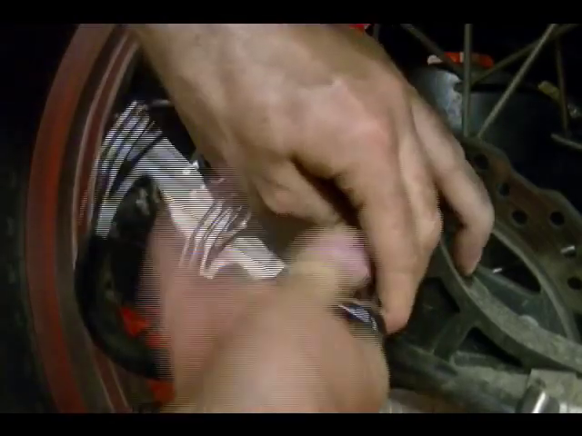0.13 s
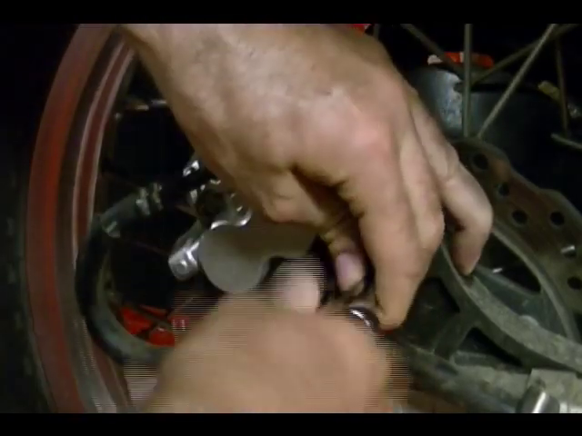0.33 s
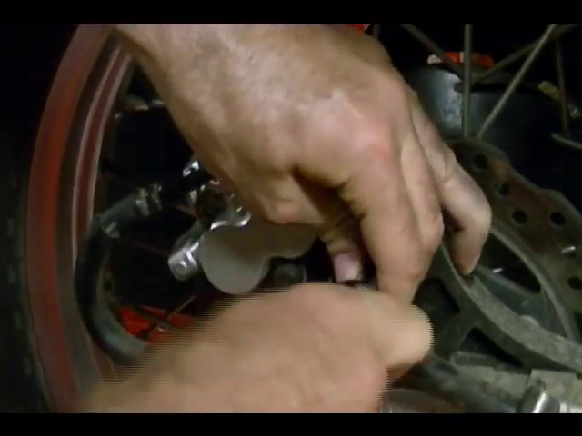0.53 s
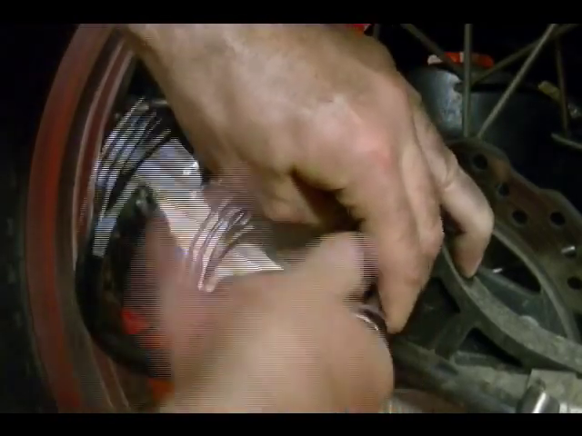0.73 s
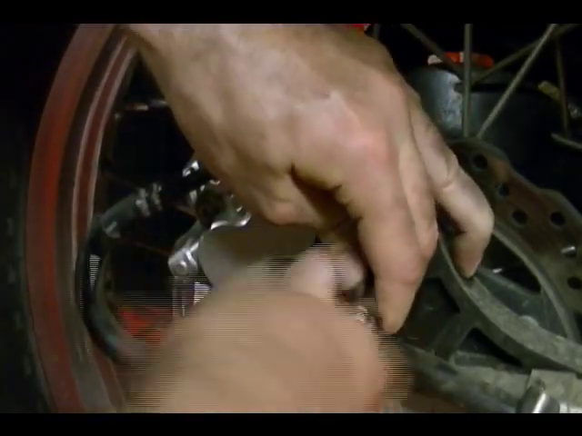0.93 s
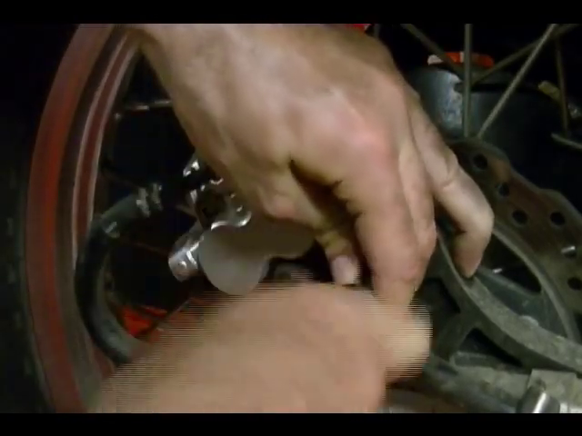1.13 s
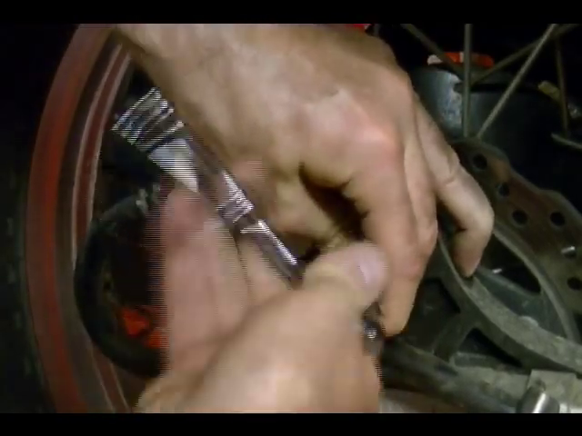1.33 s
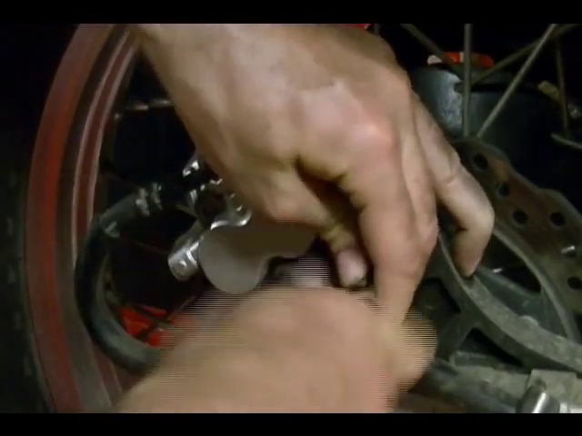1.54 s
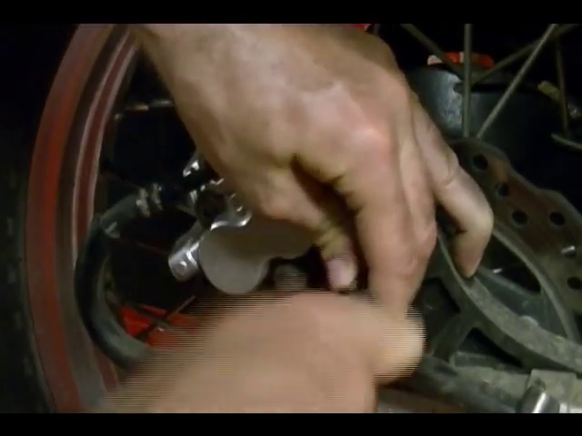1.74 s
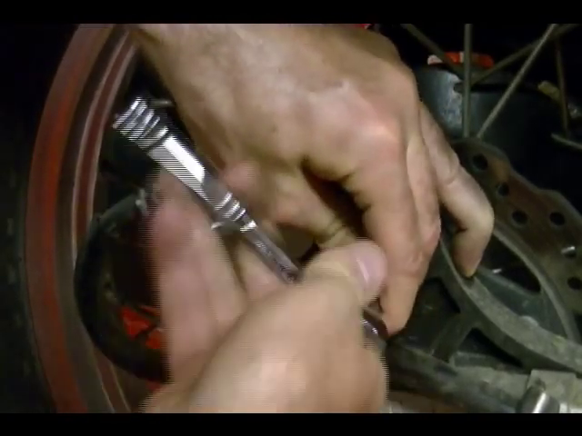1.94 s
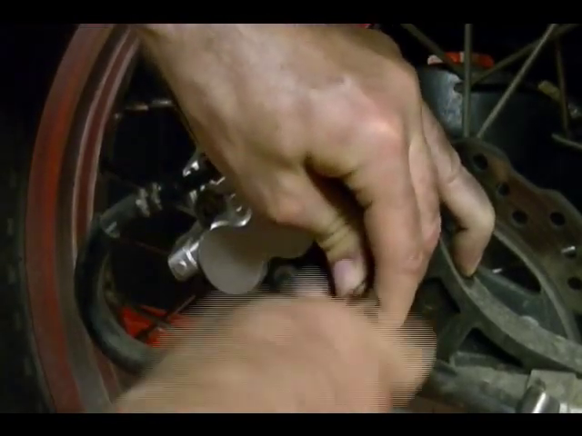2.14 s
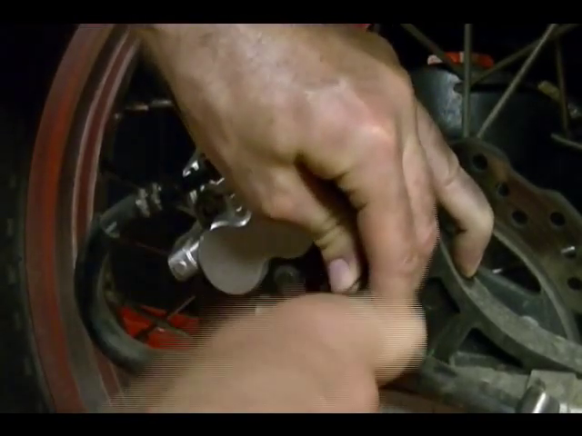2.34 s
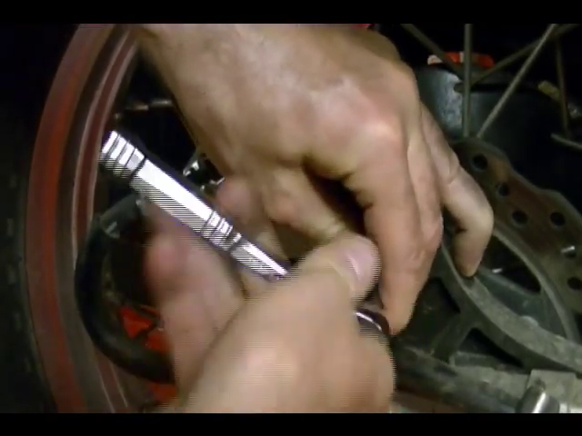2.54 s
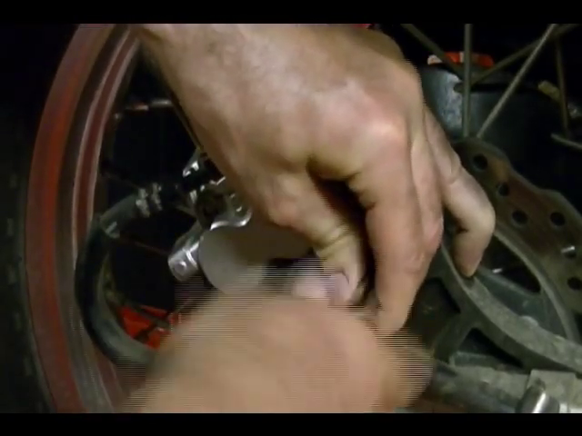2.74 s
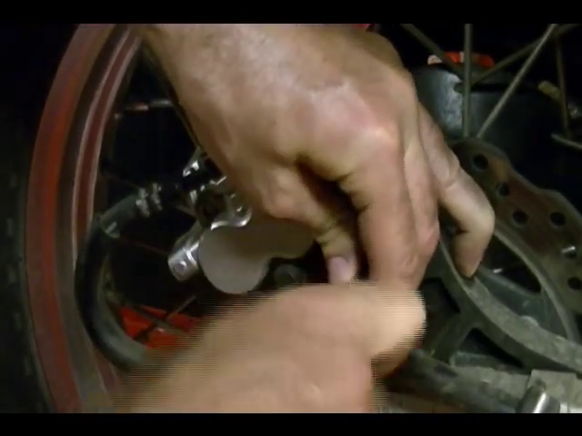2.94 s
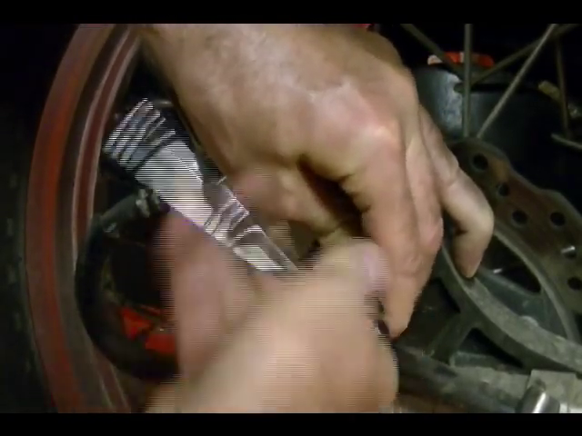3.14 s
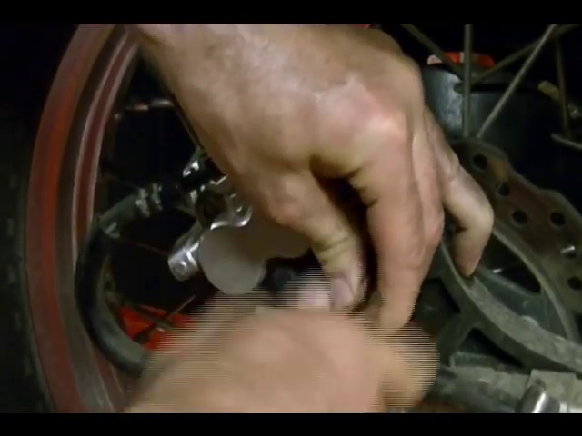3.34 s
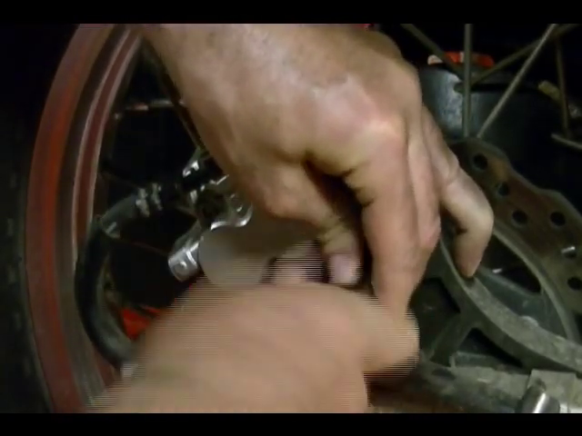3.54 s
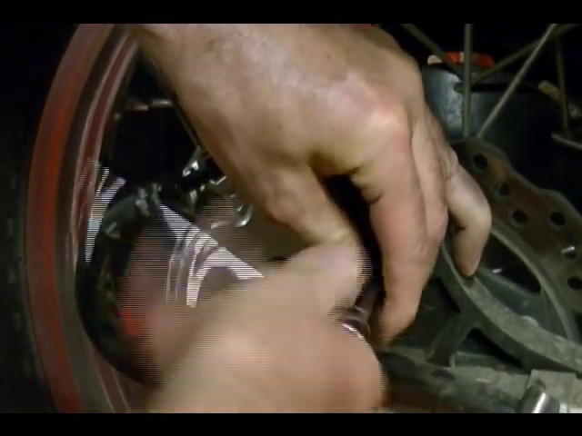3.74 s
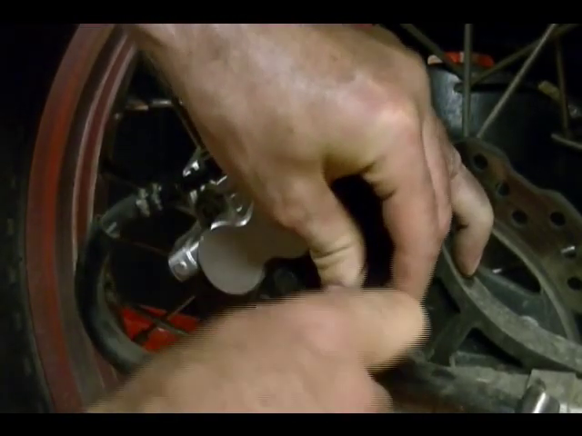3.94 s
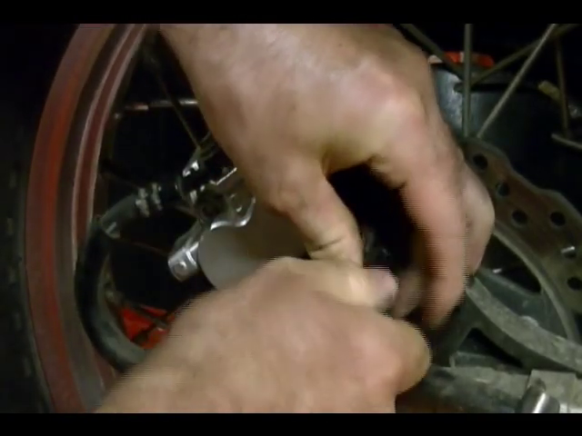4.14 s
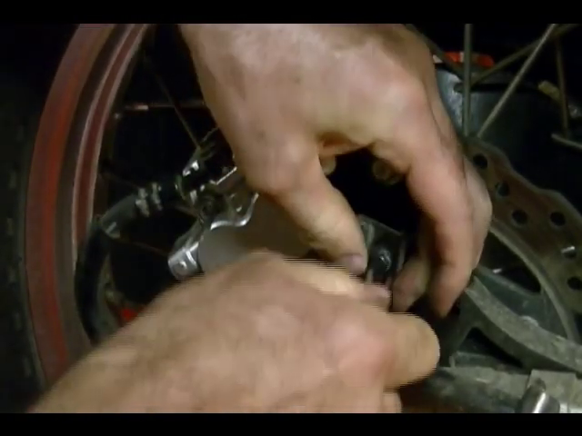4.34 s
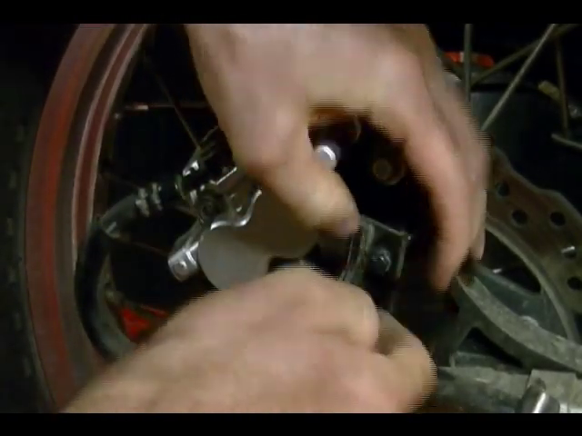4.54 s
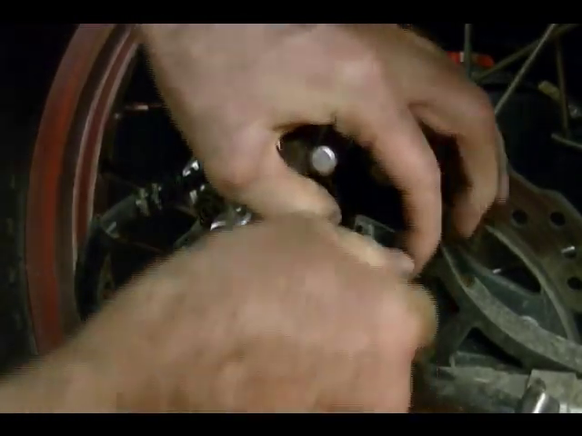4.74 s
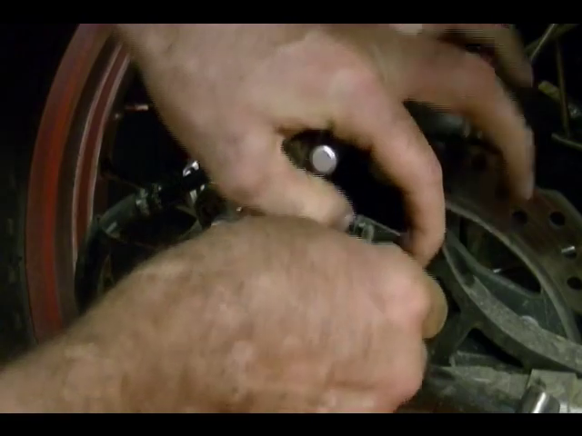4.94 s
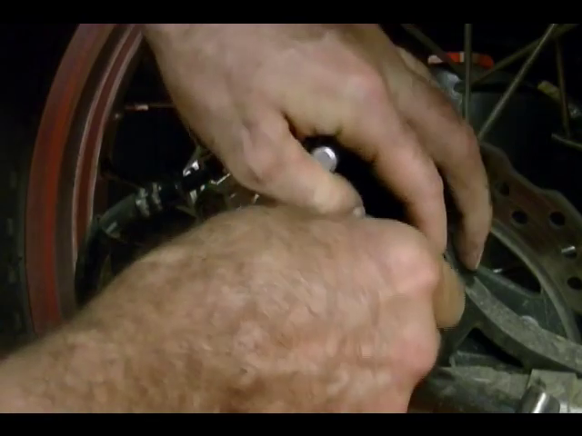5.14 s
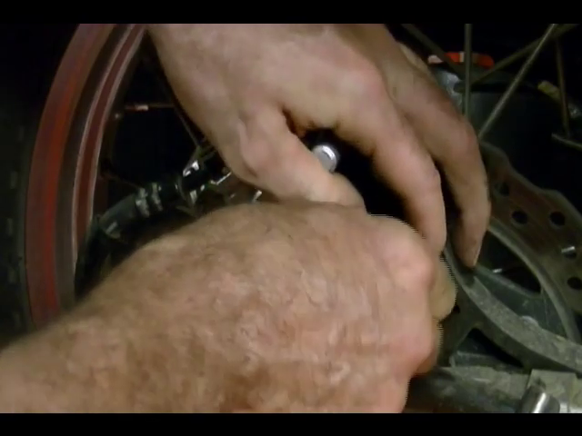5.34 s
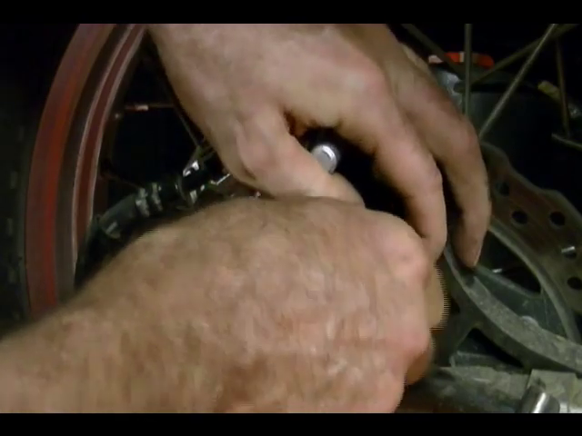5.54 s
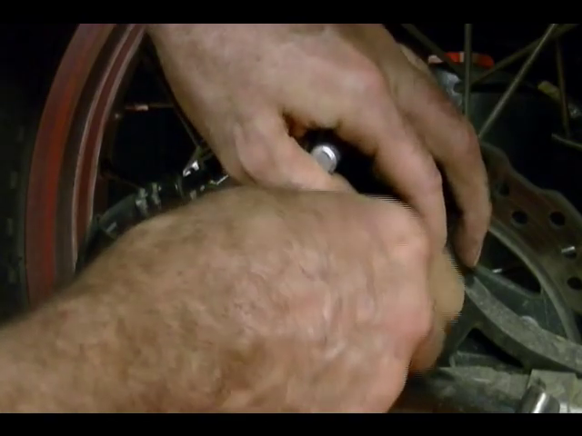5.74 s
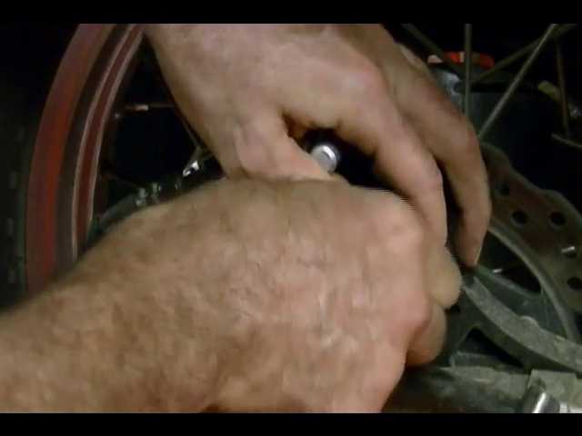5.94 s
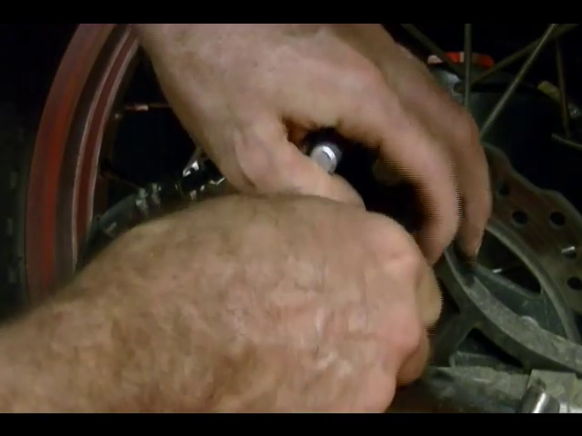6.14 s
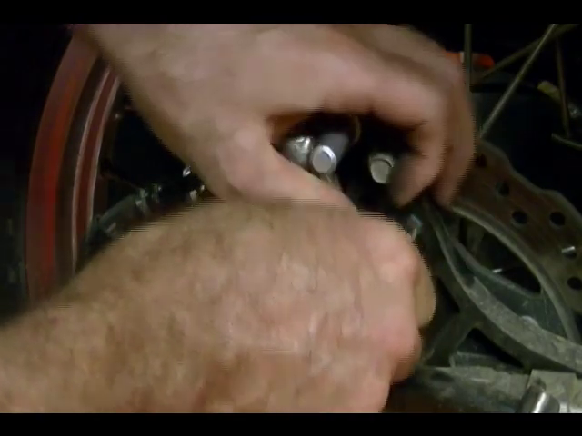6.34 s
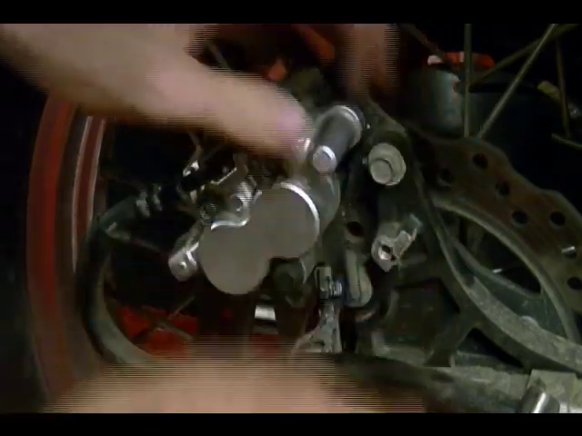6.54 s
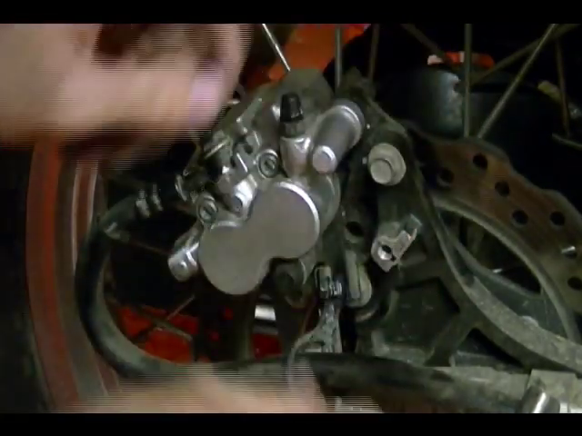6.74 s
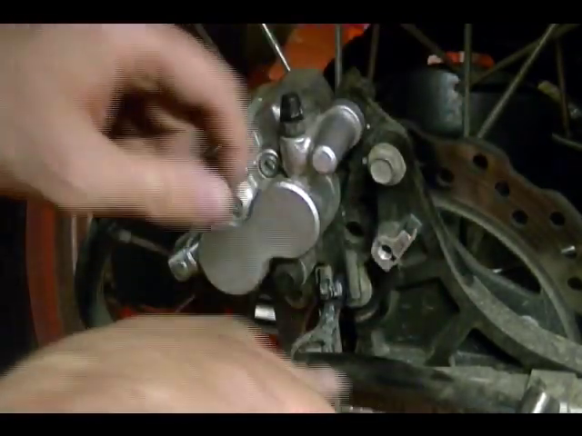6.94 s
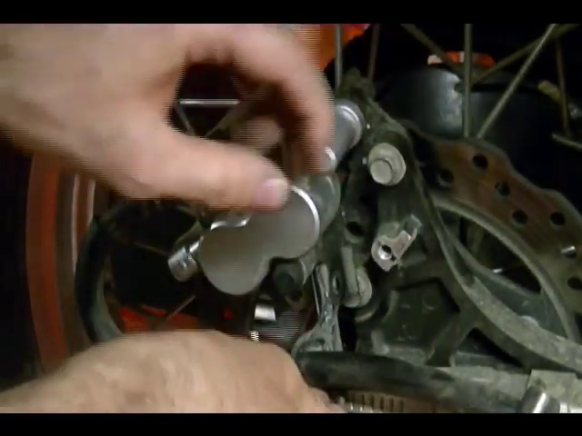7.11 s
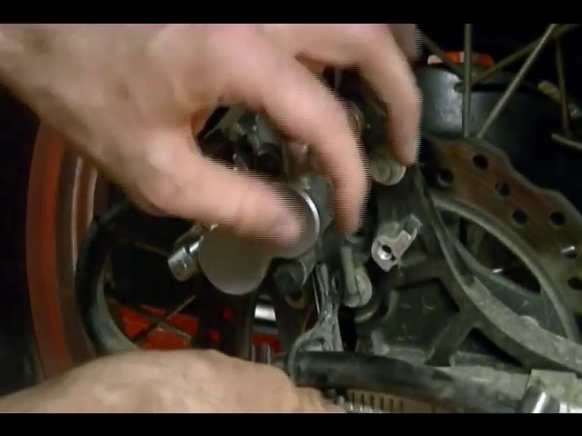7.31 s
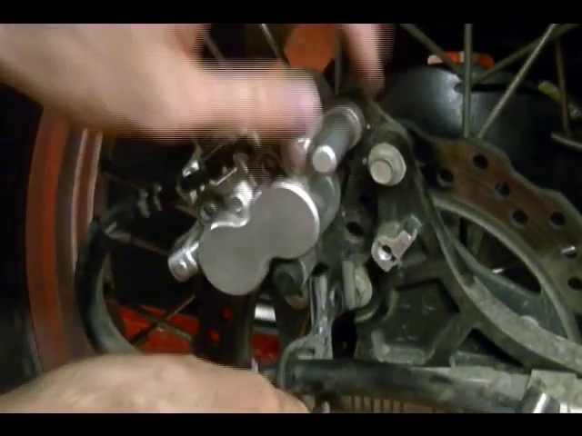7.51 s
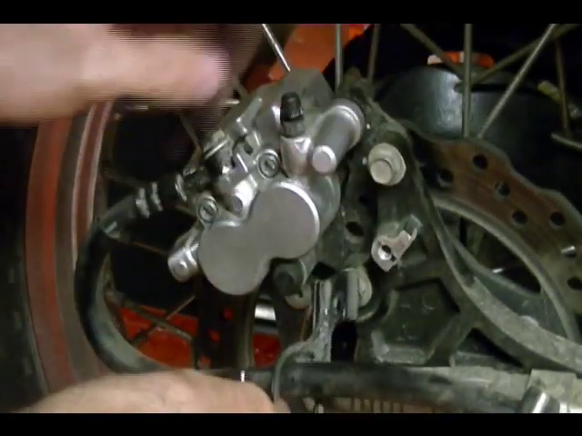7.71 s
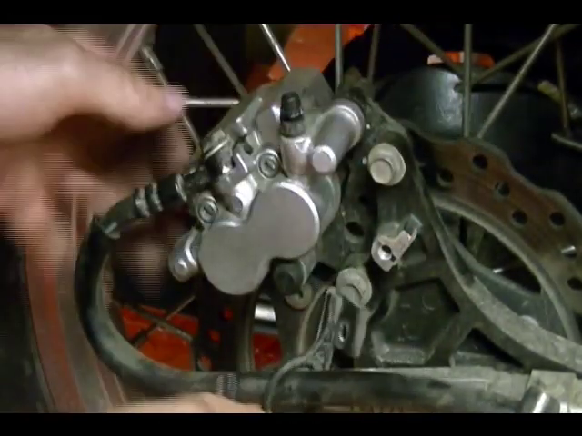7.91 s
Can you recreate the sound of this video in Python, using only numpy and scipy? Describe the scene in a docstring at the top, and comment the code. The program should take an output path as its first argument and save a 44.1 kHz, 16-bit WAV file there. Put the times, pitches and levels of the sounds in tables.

```python
"""A hand ratchet, close by, backs a bolt out of a motorcycle brake caliper in a humming garage.
On every backswing the pawl zips over the teeth and rings the ratchet head, while hands and socket
bump softly underneath. The loose bolt then clinks against socket and caliper. Last, a steel tool
drops on the concrete floor, where it bounces and wakes the room."""
import sys
import numpy as np
from scipy import signal
from scipy.fft import rfft, irfft
from scipy.io import wavfile

SR = 44100
rng = np.random.default_rng(int(sys.argv[2]) if len(sys.argv) > 2 else 0)


def int16_out(signal):
    """Quantize to a 16-bit WAV file."""
    q = np.round(np.clip(np.atleast_2d(signal).T, -1, 1) * 32767)
    wavfile.write(sys.argv[1], SR, q.astype(np.int16))


N = 355887


def amp(db):
    """Decibels to gain."""
    return 10 ** (np.asarray(db) / 20)


def curve_at(points, hz):
    """Reads a curve on a log-frequency axis."""
    point_hz, value = np.transpose(points)
    return np.interp(np.log(hz + 1), np.log(point_hz + 1), value)


def add(mix, s, sound):
    """Lays a sound into the mix at time s."""
    part = mix[max(round(s * SR), 0):][:len(sound)]
    part += sound[:len(part)]


def tint(x, colour, tilt_db=0):
    """EQs a sound to a colour, tilted by tilt_db per octave above 400 Hz, at rms 1."""
    hz = np.fft.rfftfreq(len(x), 1 / SR)
    gain = amp(curve_at(colour, hz) + tilt_db * np.log2(np.maximum(hz, 400)))
    shaped = irfft(rfft(x) * gain, len(x))
    return shaped / np.sqrt(np.mean(shaped ** 2) + 1e-20)


def contact(colour, t60, rise_s, tilt_db=0):
    """A noise burst: the crowd of short-lived modes that a contact sets off."""
    t = np.arange(SR // 10) / SR
    noise = tint(rng.standard_normal(len(t)), colour, tilt_db)
    return noise * amp(-60 * t / t60) * (1 - np.exp(-t / rise_s))


def ring(modes, spread_db, detune, size, tilt_db=0):
    """Damped modes; every blow lands elsewhere and shares its force out differently."""
    hz, db, t60 = np.transpose(modes)[:, :, None]
    t = np.arange(size) / SR
    force, shift, phase = rng.standard_normal((3, len(modes), 1))
    db = db + spread_db * force + tilt_db * np.log2(hz / hz.mean())
    waves = np.sin(2 * np.pi * (hz * (1 + detune * shift) * t + phase))
    attack = 1 - np.exp(-t / .00026)
    return (amp(db - 60 * t / t60) * waves).sum(0) * attack


def zip_run(start, end, rate, level_db, ease=.36, wobble=.13, uneven_db=2.5, falter=.6):
    """Tooth times and levels of one run: the hand is slower at both ends and falters halfway."""
    place = np.linspace(-1, 1, max(round((end - start) * rate), 2))
    gaps = (1 + ease * place ** 2) * np.exp(wobble * rng.standard_normal(len(place)))
    gaps[len(gaps) // 2] *= 1 + falter
    times = start + (end - start) * np.append(0, np.cumsum(gaps)) / gaps.sum()
    levels = level_db + uneven_db * rng.uniform(-1, 1, len(times))
    return list(zip(times, levels))


# Backswings of the handle: (run start [s], run end [s], rate [teeth/s], run level [dB],
# turning tick level [dB], stopping tooth time [s], stopping tooth level [dB])
BACKSWINGS = [(.351, .454, 112, -21.5, -30, .486, -29.5), (.63, .733, 97, -22, -39, 0.8, -26),
              (.969, 1.057, 120, -21, -44, 1.066, -31.5), (1.274, 1.382, 138, -21.5, -37.5, 1.4145, -30),
              (1.563, 1.683, 130, -20.5, -41, 1.72, -27.5), (1.873, 1.975, 142, -21.5, -35, 2.02, -25),
              (2.161, 2.267, 146, -21, -36, 2.286, -21), (2.465, 2.569, 148, -19.5, -38, 2.59, -21),
              (2.751, 2.849, 125, -20.5, -41, 2.866, -21), (3.048, 3.153, 122, -21.5, -38, 3.22, -29.5),
              (3.36, 3.471, 118, -20.7, -27, 3.524, -27), (3.749, 3.784, 140, -21, -50, 3.865, -34.5)]
# Slow nudges of the handle: (start [s], teeth [count], tooth gap [s], level [dB])
HANDLE_NUDGES = [(.008, 1, 0, -23.5), (.041, 3, 0.045, -22.5), (.164, 1, 0, -30), (3.567, 1, 0, -35),
                 (3.698, 1, 0, -36.5), (3.898, 1, 0, -34.5), (4.024, 2, 0.016, -35), (4.071, 3, .0303, -23),
                 (4.284, 1, 0, -30.5), (4.41, 2, 0.012, -21.5), (4.583, 2, 0.019, -36)]


def pawl_drops(lead_s=.019):
    """Times and levels of the clicks: a backswing ticks, zips and stops; a nudge steps evenly."""
    drops = []
    for start, end, rate, run_db, turn_db, stop, stop_db in BACKSWINGS:
        drops += [(start - lead_s, turn_db), *zip_run(start, end, rate, run_db), (stop, stop_db)]
    for start, count, gap, db in HANDLE_NUDGES:
        drops += [(start + k * gap, db) for k in range(round(count))]
    return drops


# Bright snap of the pawl: (frequency [Hz], level [dB])
SNAP_COLOUR = [(100, -21), (250, -15.5), (450, -8), (680, -19), (850, -5), (1100, -11), (2000, 1.5),
               (3700, -4.5), (5500, 5), (8000, 2.5), (10000, -2), (11500, 5), (12800, -13), (15500, -6)]
# Tight ring of the ratchet head: (frequency [Hz], level [dB], t60 [s])
HEAD_MODES = [(405, -31, 0.095), (494.5, -27, 0.057), (1726, -26, 0.072), (2308, -23, 0.055),
              (3017, -27.5, 0.098), (4600, -17, 0.034), (5420, -22, 0.02), (5910, -14.5, 0.023),
              (6150, -10, 0.037), (6216, -5, 0.035), (7540, -31, 0.042), (9300, -17.5, 0.032),
              (11650, -4, 0.016), (11300, -12.5, 0.018), (13300, -14, 0.024)]


def ratchet(snap_db=1.27, ring_db=-.7, scrape_db=-14, scrape_s=.002, tilt_spread_db=.6):
    """The pawl scrapes up each tooth, drops with a snap and rings the head, which the hand damps."""
    out = np.zeros(N)
    for s, db in pawl_drops():
        tilt_db = -tilt_spread_db * rng.standard_normal()
        snap = amp(snap_db) * contact(SNAP_COLOUR, t60=.026, rise_s=.0013, tilt_db=tilt_db)
        head = amp(ring_db) * ring(HEAD_MODES, spread_db=4, detune=.0096, size=SR // 10)
        scrape = contact(SNAP_COLOUR, t60=.021, rise_s=.0013)
        add(out, s - scrape_s, amp(db + scrape_db) * scrape)
        add(out, s, amp(db) * (snap + head))
    return out


def socket_knocks(rock_db=-32, drive_db=-35.5, spread_db=2, drive_delay_s=.08, jitter_s=.01):
    """Times and levels: the socket rocks once in each run, then knocks as it takes up the drive."""
    knocks = []
    for start, end, *_ in BACKSWINGS:
        late, rock, drive = rng.standard_normal(3)
        knocks.append((rng.uniform(start, end), rock_db + spread_db * rock))
        knocks.append((end + drive_delay_s + jitter_s * late, drive_db + spread_db * drive))
    return knocks


# How firmly the hands work on the caliper: (time [s], level [dB])
GRIP_LEVEL = [(0, -50.5), (2, -46), (3.7, -46.5), (4.5, -54), (6, -53.5), (6.5, -64), (8.05, -64)]
# Dull bump of hands and parts: (frequency [Hz], level [dB])
BUMP_COLOUR = [(30, -45), (120, -21), (250, -16), (370, -2.5), (500, 2), (650, -11), (850, -5.5),
               (1700, -6), (3000, -12.5), (7000, -18.5), (15000, -38)]


def handling(bumps_per_s=45, spread_db=2.5, bump_db=-1):
    """Fingers and loose parts bump softly, under the firmer knocks of the socket."""
    out = np.zeros(N)
    for place, chance in rng.random((round(bumps_per_s * N / SR), 2)):
        s = place * N / SR
        grip_db = np.interp(s, *np.transpose(GRIP_LEVEL))
        accent_db = spread_db * min(-np.log(1 - chance), 3)
        add(out, s, amp(grip_db + bump_db + accent_db) * contact(BUMP_COLOUR, t60=.092, rise_s=.0059))
    for s, db in socket_knocks():
        add(out, s, amp(db) * contact(BUMP_COLOUR, t60=.07, rise_s=.0081))
    return out


# Bed of room air: (frequency [Hz], level [dB])
AIR_COLOUR = [(15, -79), (25, -34), (82, -0.5), (233, -3), (331, -9), (482, -11), (598, -10), (826, -6),
              (895, -6.5), (970, -13), (1380, -14), (2300, -16), (2770, -16), (11200, -25.5), (15500, -34)]
# Electric hum: (frequency [Hz], rms level [dB])
HUM_TONES = [(91, -70.5), (120, -69.5), (360.3, -67.5), (479.6, -64.5), (640.6, -73), (839.8, -85.5),
             (959, -67), (1561, -68.5), (2250, -79.5)]


def room_tone(air_db=-56, waver=.35, phase_waver_rad=.7):
    """Steady room air and an electric hum whose tones each waver on their own."""
    t = np.arange(N) / SR
    knots = np.linspace(0, t[-1], 70)
    hum = np.zeros(N)
    for hz, db in HUM_TONES:
        swell, drift = (np.interp(t, knots, rng.standard_normal(len(knots))) for _ in range(2))
        tone = np.sqrt(2) * np.sin(2 * np.pi * hz * t + phase_waver_rad * drift)
        hum += amp(db) * (1 + waver * swell) * tone
    return amp(air_db) * tint(rng.standard_normal(N), AIR_COLOUR) + hum


# Decay of the garage: (frequency [Hz], t60 [s])
GARAGE_DECAY = [(150, .5), (500, 0.74), (2000, 0.65), (5000, 0.42), (9000, 0.3), (15000, 0.14)]


def garage_tail(build_s=.0046):
    """Dense echoes that build up quickly; the treble dies first."""
    hz, t, spectrum = signal.stft(rng.standard_normal(SR), SR, nperseg=256)
    decay = amp(-60 * t / curve_at(GARAGE_DECAY, hz)[:, None])
    tail = signal.istft(spectrum * decay, SR, nperseg=256)[1][:SR]
    return tail * (1 - np.exp(-np.arange(SR) / SR / build_s))


# EQ of the garage's reverb: (frequency [Hz], level [dB])
REVERB_COLOUR = [(150, 3), (500, 2.5), (2000, 0.5), (5000, 1), (9000, -1.5), (15000, 9)]


def garage_reverb(send):
    """What the walls give back of a sound."""
    tail = tint(garage_tail(), REVERB_COLOUR)
    return signal.fftconvolve(send, tail / np.linalg.norm(tail))[:N]


def spin_ticks(start_s=4.3, end_s=6.15, per_s=5, level_db=-49, spread_db=2, tilt_db=2, damped_db=-17):
    """Faint random contacts as the fingers spin the loose bolt and damp its ring."""
    ticks = []
    for _ in range(round(per_s * (end_s - start_s))):
        db = level_db + spread_db * rng.standard_normal()
        ticks.append((rng.uniform(start_s, end_s), db, tilt_db, db + damped_db, db + damped_db))
    return ticks


# Bolt, socket and caliper touching: (time [s], knock level [dB], brightness [dB/octave],
# socket ring [dB], caliper ring [dB], chatter lead-in [s])
BOLT_CLINKS = [(5.260, -40.5, -5, -74, -49, 0.00055), (5.630, -37.5, 1, -59, -62, 0.00021),
               (5.676, -35, -2.5, -59, -41, 0.0005), (5.963, -31.5, 1, -48, -45, 0),
               (6.253, -17, -1, -22.5, -17, .082), (6.260, -24.5, -1, -22.5, -21.5, 0),
               (6.875, -39.5, 6.5, -52, -65, 0), (7.0413, -18.5, 0.6, -19, -46, 0.028),
               (7.096, -31, 9, -25, -32.5, 0.0014), (7.139, -34.5, 9, -30.5, -52, 0.001)]


def clinks(chatter_gap_s=.016, chatter_db=-19, chatter_ring_db=-17.5):
    """Cues for every clink; the parts chatter lightly as they slide up to a hard knock."""
    cues = []
    for s, db, tilt_db, socket_db, caliper_db, lead_s in BOLT_CLINKS:
        chatter = (db + chatter_db, tilt_db, socket_db + chatter_ring_db, caliper_db + chatter_ring_db)
        for early in np.linspace(lead_s, 0, round(lead_s / chatter_gap_s), endpoint=False):
            cues.append((s - early, *chatter))
        cues.append((s, db, tilt_db, socket_db, caliper_db))
    return cues + spin_ticks()


# Knock of the bolt: (frequency [Hz], level [dB])
KNOCK_COLOUR = [(30, -40), (120, -24), (220, -25.5), (460, 3.5), (700, -2.5), (1150, -1.5), (1700, 3.5),
                (2500, 5), (3500, -1.5), (6300, 0), (9500, -9.5), (15000, -27.5)]
# Thin ring of the socket, lower ring of the caliper, ping of the bolt:
# (frequency [Hz], level [dB], t60 [s])
SOCKET_MODES = [(2195, -11, .05), (3898, -17, .13), (4673, -11, .13), (7197, -5, .125), (7983, -14, .11),
                (8448, -4, .19), (8735, -3.5, .15), (11840, -8, .135), (13295, -6, .115)]
CALIPER_MODES = [(796, -12.5, 0.086), (1042, -6.5, 0.043), (1226, -4, .035), (1520, -5, 0.08),
                 (2610, -2.5, 0.047), (3870, -17, 0.056)]
BOLT_MODES = [(3903, -6, .15), (4670, 0, 0.081), (8769, -8, .12)]


def loose_bolt(knock_db=-1, socket_ring_db=-2, caliper_ring_db=-3, choke_db=-7, choke_s=.017,
               ping_s=6.903, ping_db=-42.5):
    """The loose bolt knocks and rings socket and caliper; once freed, it gives a single ping."""
    out = np.zeros(N)
    t = np.arange(16384) / SR
    # the fingers touch the parts for a moment after each knock, which chokes the ring
    choke = amp(choke_db * (1 - np.exp(-t / choke_s)))
    for s, db, tilt_db, socket_db, caliper_db in clinks():
        socket = ring(SOCKET_MODES, spread_db=2, detune=.0005, size=len(t), tilt_db=.43 * tilt_db)
        caliper = ring(CALIPER_MODES, spread_db=1.5, detune=.004, size=len(t))
        knock = contact(KNOCK_COLOUR, t60=.051, rise_s=.00033, tilt_db=tilt_db)
        add(out, s, amp(db + knock_db) * knock)
        add(out, s, amp(socket_db + socket_ring_db) * choke * socket)
        add(out, s, amp(caliper_db + caliper_ring_db) * choke * caliper)
    add(out, ping_s, amp(ping_db) * ring(BOLT_MODES, spread_db=1, detune=.001, size=len(t)))
    return out


# The tool hitting the floor: (time [s], strength relative to the first blow [dB])
TOOL_BOUNCES = [(7.4574, 0), (7.466, -7), (7.583, -2.5), (7.637, -8), (7.703, -6.5), (7.758, -12.5),
                (7.783, -8), (7.905, -22), (7.955, -21.5)]
# Crack of steel on concrete, and the room's answer: (frequency [Hz], level [dB])
CRACK_COLOUR = [(60, -37), (200, -25), (400, 1.5), (700, -6), (1100, -6), (2700, 0.5), (4200, -2.5),
                (7700, 7.5), (10000, -1.5), (12500, -9), (16000, -26)]
ECHO_COLOUR = [(60, -46), (200, -13), (400, -3.5), (700, -3.5), (1100, -1), (2700, 1.5), (5000, 4),
               (8000, 0), (10000, -4), (12500, -12), (16000, -25)]
# Low tones that hang on after the drop: (frequency [Hz], level [dB], t60 [s])
LINGERING_MODES = [(382, 1.5, 1.4), (493, -5, .9), (608, -1, .6), (776, 1, .35)]


def dropped_tool(crack_db=-1.5, rattle_db=-7, echo_db=-25.5, linger_db=-42):
    """Steel on concrete: every bounce cracks, rattles and, from a new spot, wakes the room."""
    out = np.zeros(N)
    for s, strength_db in TOOL_BOUNCES:
        db = crack_db + 2 * strength_db  # a weaker blow loses its crack faster than its echo
        tilt_db = .85 + .22 * strength_db  # and is duller
        crack = contact(CRACK_COLOUR, t60=.011, rise_s=.0001, tilt_db=tilt_db)
        rattle = contact(CRACK_COLOUR, t60=.052, rise_s=.0014, tilt_db=tilt_db)
        echo = tint(garage_tail(), ECHO_COLOUR, tilt_db)
        add(out, s, amp(db) * (crack + amp(rattle_db) * rattle))
        add(out, s, amp(echo_db + strength_db) * echo / echo[:SR // 10].std())
    lingering = ring(LINGERING_MODES, spread_db=1.5, detune=.002, size=SR)
    add(out, TOOL_BOUNCES[0][0], amp(linger_db) * lingering)
    return out


def scene(work_send_db=-11, bolt_send_db=-10):
    """Ratchet, hands and bolt are near and fairly dry; the dropped tool is farther off."""
    work = ratchet() + handling()
    bolt = loose_bolt()
    reverb = garage_reverb(amp(work_send_db) * work + amp(bolt_send_db) * bolt)
    return (work + bolt + reverb + dropped_tool() + room_tone())[None]


def record(dry, threshold_db=-18, recover_db_per_s=4, low_cut_hz=38, ceiling=.55, high_cut_hz=15780):
    """A small microphone: low cut, gain control that ducks on the loudest hit, overload, high cut."""
    low_cut = signal.butter(2, low_cut_hz, "highpass", fs=SR, output="sos")
    sound = signal.sosfilt(low_cut, dry[0])
    power = signal.lfilter(np.ones(220) / 220, 1, sound ** 2)  # 5 ms average
    level_db = 10 * np.log10(power + 1e-12)
    recovery_db = np.arange(N) / SR * recover_db_per_s
    held_db = np.maximum.accumulate(level_db + recovery_db) - recovery_db  # instant grab, slow release
    duck_db = np.maximum(held_db - threshold_db, 0)
    clipped = np.clip(sound * amp(-duck_db), -ceiling, ceiling)
    high_cut = signal.firwin(511, high_cut_hz, window=("kaiser", 9), fs=SR)
    return signal.oaconvolve(clipped, high_cut, "same")[None]


dry = scene()
out = record(dry)
int16_out(out)
```